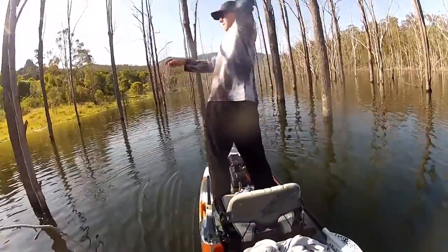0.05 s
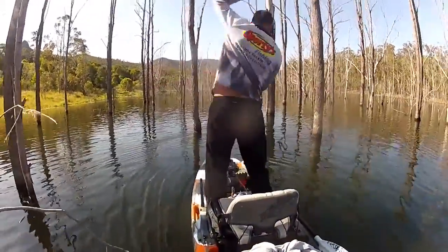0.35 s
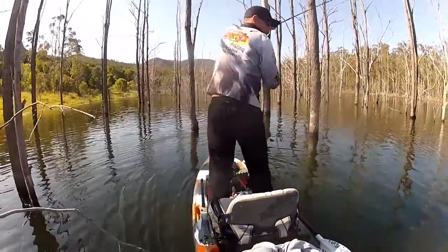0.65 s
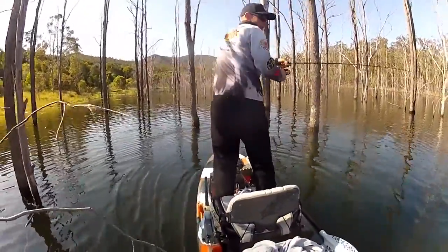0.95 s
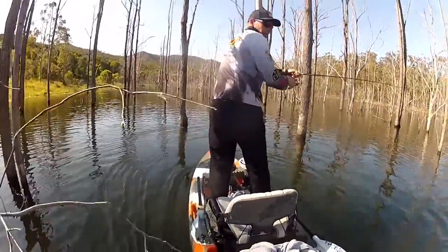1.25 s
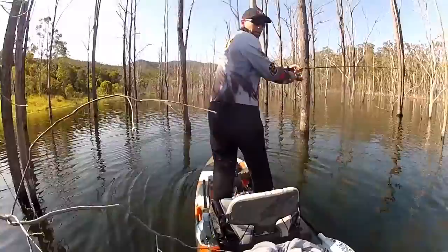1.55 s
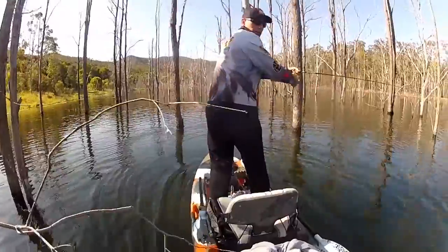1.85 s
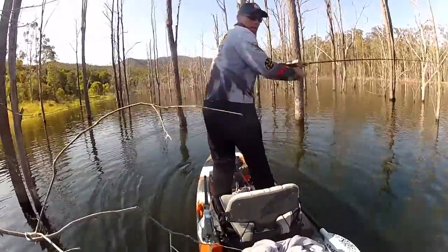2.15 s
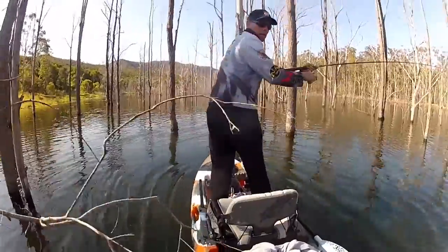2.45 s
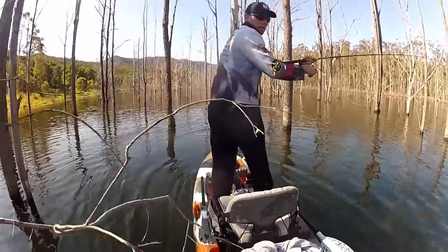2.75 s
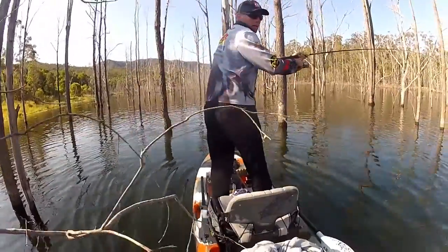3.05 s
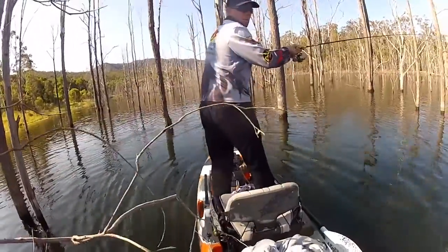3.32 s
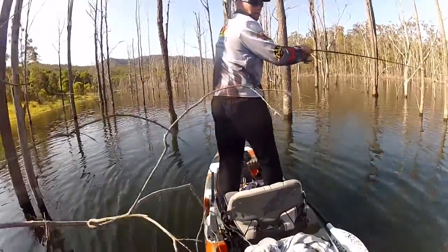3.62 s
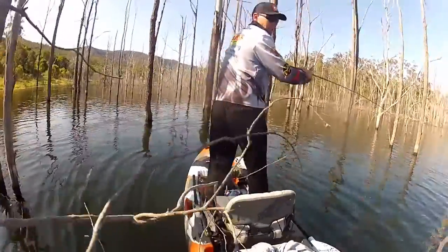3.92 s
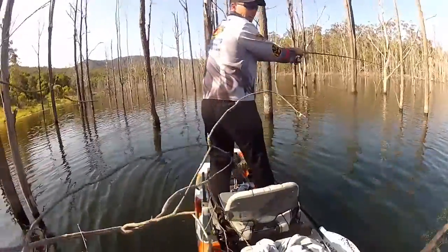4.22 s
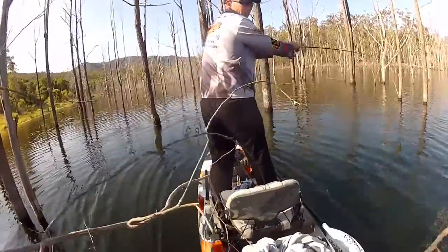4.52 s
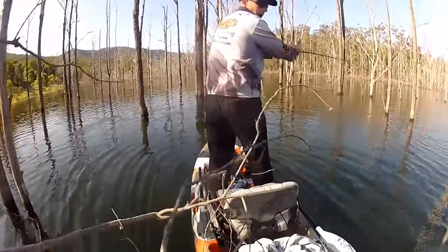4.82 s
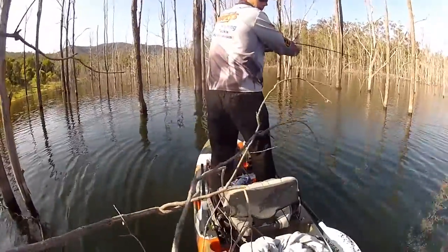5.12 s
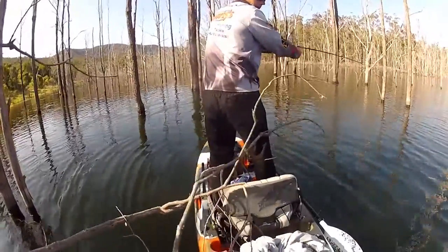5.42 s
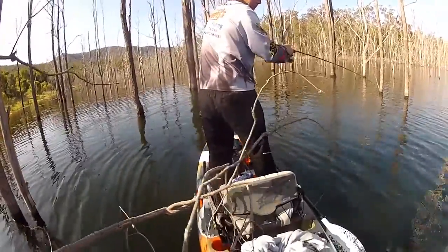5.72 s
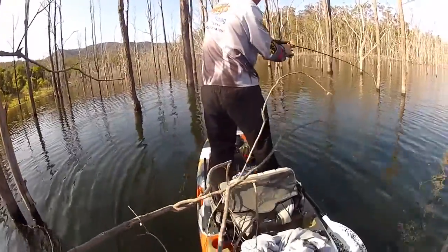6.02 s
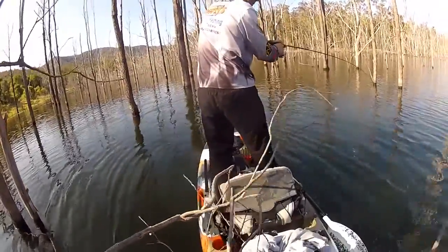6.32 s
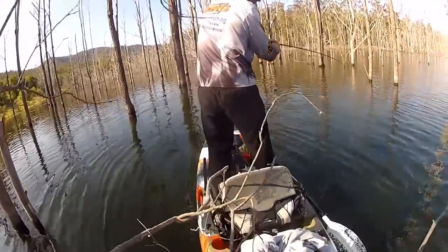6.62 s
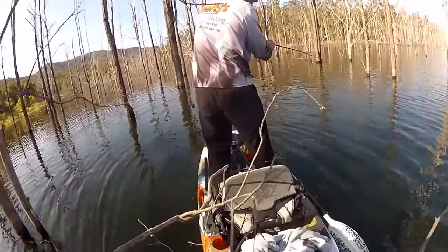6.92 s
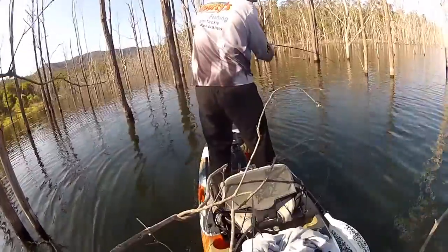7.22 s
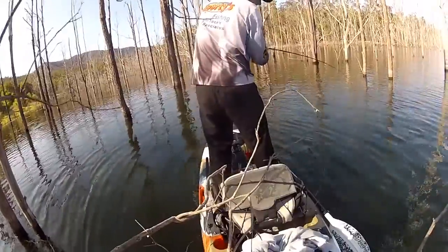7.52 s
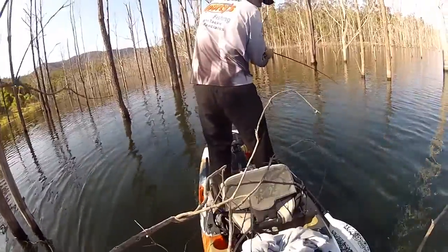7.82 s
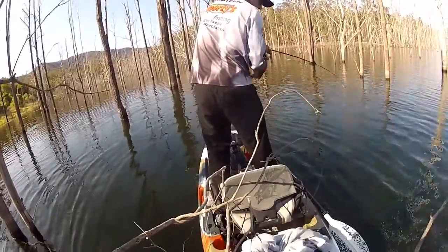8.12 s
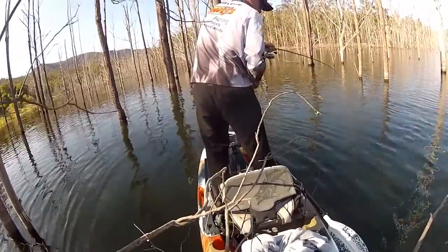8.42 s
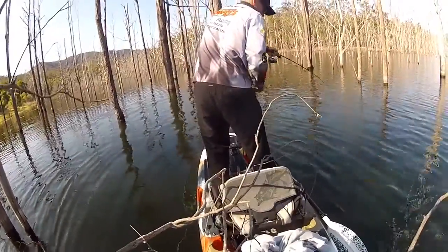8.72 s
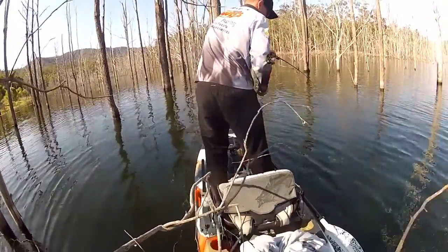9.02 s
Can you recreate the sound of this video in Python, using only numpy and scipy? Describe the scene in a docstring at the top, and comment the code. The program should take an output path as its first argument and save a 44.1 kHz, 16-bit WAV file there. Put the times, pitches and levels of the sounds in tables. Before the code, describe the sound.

Dead branches drag over a plastic kayak on a calm lake, heard very close from a microphone on the boat. Faint lapping, light twig taps and three barely audible distant bird notes come first. Then dry bark scrapes in uneven bursts, with sharp cracks, brief squeaks and hollow booms from the hull. After one more loud crunch, the contact thins to soft rubbing and scattered ticks.

```python
"""Kayak among dead branches

A plastic kayak drifts into dead branches on a calm lake, heard from a housed camera on its stern.
Dry bark drags over the boat by stick-slip friction, driving the resonances of twigs, limb and hull.
Twigs catch, spring free and knock; the hollow hull booms under the heavier strokes.
Water laps faintly, and a far bird gives three notes."""
import sys
import numpy as np
from scipy import signal
from scipy.fft import rfft, irfft, next_fast_len
from scipy.io import wavfile
from scipy.ndimage import uniform_filter1d

SR = 44100
rng = np.random.default_rng(int(sys.argv[2]) if len(sys.argv) > 2 else 0)


def to_wav(sig):
    """Store sig (one row per channel, or 1-D mono) as 16-bit WAV at the path in sys.argv[1].

    Samples outside -1..1 are clipped; the rate is SR.
    """
    pcm = np.clip(np.atleast_2d(sig), -1, 1) * 32767
    pcm = np.round(pcm).astype(np.int16)
    wavfile.write(sys.argv[1], SR, pcm.T)  # frames by channels


N = 403515
TIME = np.arange(N) / SR

# Spectrum of open water and air. Each row: frequency in Hz, relative spectral density in dB.
LAKE_SPECTRUM = [(15, -37.5), (25, -11), (101, -5), (264, -10.5), (394, -13), (709, -20), (879, -24),
                 (1280, -24.5), (1420, -28.5), (2020, -27), (2780, -31), (5420, -34.5), (6040, -37),
                 (12100, -36.5), (15000, -47)]
# A far bird's notes. Each row: centre in seconds, pitch in Hz, level in dB.
BIRD_NOTES = [(0.935, 2400, -76), (1.12, 2480, -69), (1.62, 2460, -67)]

# Modes of the hollow hull, its panels, the thick limb, the twigs, the bark's grit and cracking wood.
# Each row: frequency in Hz, bandwidth in Hz, relative gain in dB.
HULL_MODES = [(41.6, 14, -8.5), (72.4, 9.2, 0), (114, 27, 3.5), (177, 19, 1), (218, 36, 0.5),
              (277, 17, -10.5), (324, 91, -14)]
PANEL_MODES = [(450, 70, -9), (533, 44, -1), (660, 65, -3), (848, 52, 0), (955, 70, -8)]
LIMB_MODES = [(1020, 180, -2.5), (1064, 90, 5.5), (1403, 120, 6.5), (1606, 170, -4.5)]
TWIG_MODES = [(1794, 109, 3), (1865, 56, 1.5), (1959, 62, 4.5), (2290, 160, 0.5), (2560, 120, -2.5),
              (3038, 140, -7), (3426, 104, -3.5), (3712, 160, -4.5), (4390, 590, -16.5)]
GRIT_MODES = [(7330, 830, -20.5), (8520, 110, 0), (9720, 460, -5), (9770, 1120, 6), (10130, 1800, 1),
              (14200, 530, -3.5)]
CRACK_MODES = [(3450, 160, -1), (4847, 2700, -11), (6700, 2000, -10.5), (8240, 520, -2), (10010, 590, 2.5),
               (14900, 800, -2)]

# Soft pushes on the hull. Each row: centre in seconds, level in dB.
NUDGES = [(0.88, -51), (2.15, -53.5), (3.672, -31)]
# Skids that set one mode of twig or hull singing.
# Each row: centre in seconds, half-length in seconds, level in dB, frequency in Hz.
SLIDES = [(1.433, 0.0028, -39.5, 3480), (1.488, .0074, -51, 1020), (2.45, .03, -39, 300),
          (2.707, 0.0074, -31, 1850), (2.784, 0.073, -40, 985), (3.607, 0.0038, -13.5, 3285),
          (3.66, 0.022, -33, 44), (3.785, .03, -35, 488), (3.906, 0.044, -28, 526),
          (3.907, 0.025, -30.5, 866), (3.99, 0.054, -41, 70), (4.134, .06, -38, 199),
          (4.197, 0.065, -33.5, 1893), (4.558, .025, -40.5, 211), (4.612, 0.019, -27.5, 2100),
          (4.625, 0.038, -38, 1153), (4.693, 0.045, -30.5, 537), (4.73, .09, -36.5, 189),
          (4.79, 0.089, -43.5, 510), (6.271, .013, -14.5, 1865), (6.287, .025, -32.5, 205),
          (6.29, .03, -37, 70), (6.37, 0.055, -55, 660), (6.453, 0.085, -40, 114), (6.512, 0.016, -41, 850),
          (6.555, 0.0059, -36.5, 1390), (7.103, 0.031, -51, 1370), (7.48, 0.014, -57, 1447),
          (7.349, .017, -54.5, 1370), (7.711, 0.0098, -50.5, 3580), (8.819, 0.023, -43.5, 886),
          (8.863, 0.011, -42.5, 1250), (8.937, .01, -47, 1420)]
# Strokes of bark over the boat. Each row: start, hardest moment and end in seconds,
# twig drive in dB, then limb drive and hull drive in dB relative to the twigs.
STROKES = [(2.126, 2.148, 2.29, -61.5, -5, -3), (2.399, 2.445, 2.7, -33.5, 0, -7.5),
           (2.744, 2.843, 3.01, -35.5, 1.5, -10.5), (3.083, 3.242, 3.264, -39.5, 0.5, -16),
           (3.38, 3.42, 3.55, -52.5, -0.5, -14), (3.43, 3.54, 3.53, -37.5, 1, -20),
           (3.532, 3.587, 3.625, -23, -4, -14), (3.655, 3.671, 3.69, -27.5, -2.5, -2),
           (3.676, 3.754, 3.85, -34.5, -3, -0.5), (3.796, 3.904, 3.92, -31.5, 2.5, 0.5),
           (3.914, 3.948, 4.28, -44, -4, 4.5), (4.062, 4.146, 4.18, -33, -3, -9),
           (4.137, 4.19, 4.26, -33.5, -5, -8.5), (4.257, 4.295, 4.42, -39.5, -6.5, -6),
           (4.394, 4.492, 4.52, -45, -9.5, -14), (4.494, 4.61, 4.62, -34, -9, -7),
           (4.632, 4.676, 4.936, -31, -5.5, -3.5), (4.86, 4.872, 5, -41.5, -4.5, -4.5),
           (4.945, 5.055, 5.13, -49, -1, -6), (5.1, 5.184, 7.19, -56.5, 0.5, -4),
           (5.43, 5.55, 5.75, -45.5, -4, -6), (5.729, 5.748, 5.9, -37.5, -3.5, -7.5),
           (5.784, 5.903, 5.93, -37.5, -7, -14.5), (6.022, 6.077, 6.15, -54, -6, -2),
           (6.129, 6.13, 6.43, -53.5, -7.5, -4), (6.27, 6.262, 6.31, -25, -5, -4),
           (6.31, 6.332, 6.61, -36, -7, -4), (6.57, 6.59, 6.62, -57.5, -2, -4),
           (6.63, 6.66, 6.82, -50.5, -2.5, -6), (7.017, 7.119, 7.26, -53, -2.5, -11),
           (7.291, 7.32, 7.42, -54.5, -1, -10), (7.45, 7.569, 7.82, -60, 2, -8.5),
           (7.87, 7.989, 8.1, -62, -4.5, -3), (8.457, 8.66, 8.85, -61, 1.5, -9),
           (8.804, 8.91, 9.18, -47, -4.5, -9)]
# Twigs striking the boat, each level being the energy spread over 10 ms.
# Each row: start in seconds, twig, limb and panel levels in dB, decay time of the crunch in seconds.
KNOCKS = [(0.686, -60, -57, -51.5, 0.0085), (0.818, -68, -63, -57, .004),
          (0.958, -52.5, -51, -53.5, 0.0055), (1.294, -54, -61, -55.5, 0.0058),
          (1.357, -64, -70, -60, 0.0022), (1.421, -44, -53, -59, 0.0073), (1.4302, -33, -31.5, -51, 0.0025),
          (1.451, -66, -59, -53, .004), (1.6545, -45, -48.5, -55, 0.0074), (1.7, -65, -66, -69, 0.0077),
          (1.761, -61.5, -61, -69, 0.021), (2.235, -50.5, -52.5, -65, 0.0022),
          (2.264, -52.5, -57, -76, .001), (2.385, -30.5, -46, -37.5, 0.0056),
          (2.4554, -20, -20.5, -23.5, 0.002), (2.507, -32, -35, -31.5, 0.0043),
          (2.5314, -25.5, -23, -31, 0.0036), (2.565, -33.5, -57, -37, 0.0025),
          (2.691, -27.5, -39.5, -43.5, 0.014), (2.8173, -26, -18.5, -39, 0.00055),
          (3.5473, -18.5, -21.5, -35, 0.0017), (3.5902, -18, -26, -30, 0.0058),
          (3.603, -9, -19, -25, 0.0013), (3.615, -23, -34, -36, 0.0016), (3.621, -19, -25, -22.5, 0.0011),
          (3.6521, -19, -22, -35, 0.0014), (3.6552, -10.5, -14, -23.5, 0.0028),
          (3.7, -27.5, -31.5, -43.5, .002), (3.824, -24.5, -25.5, -52, 0.0047),
          (3.8922, -18, -20, -27, 0.0021), (3.917, -35, -40, -29, 0.0033), (4.07, -30, -46, -36.5, 0.0077),
          (4.081, -31.5, -31, -30, 0.0027), (4.1107, -18.5, -19.5, -24.5, 0.0024),
          (4.139, -45, -28, -26, 0.0054), (4.285, -34.5, -41, -35, 0.0029),
          (4.548, -33, -43, -39.5, 0.0023), (4.678, -26.5, -30, -25, 0.0023),
          (4.7155, -20.5, -28.5, -24.5, 0.0054), (4.9815, -35, -54, -51, 0.0032),
          (5.04, -37, -40, -55, 0.0025), (5.053, -40, -58, -54, .0015), (5.081, -44, -52, -57, 0.0068),
          (5.294, -51, -64, -66, .003), (5.139, -52, -53, -52, .004), (5.264, -45, -60, -65, 0.0057),
          (5.319, -46, -65, -72, 0.0049), (5.766, -28, -47, -45, 0.0098), (6.0176, -32, -37, -50, 0.0011),
          (6.2618, -24, -26, -30, 0.0068), (6.2715, -23, -29, -26.5, 0.0096),
          (6.2925, -28, -37, -36, 0.0026), (6.326, -30, -37, -58, 0.0037),
          (6.43, -35.5, -38.5, -52, 0.0014), (6.473, -43, -57, -63, 0.0011),
          (6.7, -43.5, -38.5, -51, 0.0044), (6.845, -40.5, -45, -50.5, 0.01),
          (6.981, -52, -55.5, -66, 0.0026), (7.323, -53, -57.5, -59.5, .003),
          (7.575, -54, -61, -59, 0.0037), (7.6178, -46, -54.5, -64, 0.0073),
          (7.701, -49.5, -62.5, -61, 0.0029), (8.808, -51.5, -55, -54, .006),
          (8.824, -51, -52, -49.5, .003), (8.8758, -38, -47, -64, 0.0036), (8.924, -41, -47, -54, 0.008)]
# Narrow bands missing from the treble, near 6 and 12 kHz. Each row: frequency in Hz, bandwidth in Hz.
TREBLE_NOTCHES = [(5840, 1400), (6314, 560), (12060, 840), (11770, 1200)]


def from_db(db):
    """Amplitude ratio of a level in decibels."""
    return 10 ** (np.asarray(db) / 20)


def unit_rms(x):
    """Normalisation to unit mean power."""
    return x / np.sqrt(np.mean(x ** 2) + 1e-20)


def drift(rate_hz):
    """Two-pole low-pass noise: a slow random wander of unit spread."""
    step, settle = 40, 2000   # samples per point; points left for the filter to settle
    pole = np.exp(-2 * np.pi * rate_hz * step / SR)
    noise = rng.standard_normal(N // step + settle + 2)
    slow = signal.lfilter([1], [1, -2 * pole, pole * pole], noise)[settle:]
    return np.interp(np.arange(N) / step, np.arange(len(slow)), unit_rms(slow))


def butterworth(x, hz, kind, order=2):
    """A filter with a maximally flat passband."""
    return signal.sosfilt(signal.butter(order, hz, kind, fs=SR, output="sos"), x)


def swell(centre_s, half_length_s):
    """A Gaussian envelope: a smooth rise and fall around one moment."""
    return np.exp(-np.minimum(2 * ((TIME - centre_s) / half_length_s) ** 2, 60))


def steady(x, span_s):
    """Division by the running rms holds the power even and keeps the faster grain."""
    return x / np.sqrt(np.abs(uniform_filter1d(x * x, int(span_s * SR))) + 1e-14)


def shaped_noise(spectrum):
    """Spectral weighting colours white noise; the result has unit power."""
    hz, db = np.transpose(spectrum)
    size = next_fast_len(N)
    bins_hz = np.maximum(np.fft.rfftfreq(size, 1 / SR), 1)
    gain = from_db(np.interp(np.log(bins_hz), np.log(hz), db))
    return unit_rms(irfft(rfft(rng.standard_normal(size)) * gain, size)[:N])


def resonate(force, modes, wander_db=0):
    """Modal superposition, neighbours in opposite sense; a travelling contact varies each one's drive."""
    out = 0
    for k, (hz, width, db) in enumerate(modes):
        radius = np.exp(-np.pi * width / SR)
        feedback = [1, -2 * radius * np.cos(2 * np.pi * hz / SR), radius ** 2]
        drive = force * from_db(wander_db * drift(2.3)) if wander_db else force
        ring = signal.lfilter([1, 0, -1], feedback, drive + 1e-18)
        out = out + (-1) ** k * (1 - radius ** 2) * from_db(db) * ring
    band_hz = [0.55 * modes[0][0], min(1.325 * modes[-1][0], SR / 2 - 1000)]
    return butterworth(out, band_hz, "band", order=3)


def slips(per_s, spread_db, clump_db, clump_hz):
    """Stick-slip friction: a Poisson train of tiny, uneven jerks whose strength comes in clumps."""
    sizes = from_db(spread_db * np.minimum(rng.exponential(1, N), 4)) * rng.choice([-1, 1], N)
    slipping = rng.random(N) < per_s / SR
    return sizes * slipping * from_db(clump_db * drift(clump_hz))


def lake():
    """Lapping is coloured noise, in phase at both ears; faint wind and wash arrive in antiphase."""
    lapping = from_db(-60.5) * shaped_noise(LAKE_SPECTRUM) * from_db(0.38 * drift(9.2))
    wind = from_db(-82.5) * unit_rms(butterworth(rng.standard_normal(N), 45, "low", order=1))
    wash = from_db(-77) * shaped_noise(LAKE_SPECTRUM)
    return lapping + (wind + wash) * [[1], [-1]]


def bird():
    """Faint notes from the shore: pure tones under Gaussian envelopes."""
    return sum(from_db(db) * swell(centre, 0.03) * np.sin(2 * np.pi * hz * TIME)
               for centre, hz, db in BIRD_NOTES)


def nudges():
    """Forced vibration: a soft push drives the hull's low modes into a dull thud."""
    push = sum(from_db(db) * swell(centre, 0.029) for centre, db in NUDGES)
    return push * steady(resonate(rng.standard_normal(N), HULL_MODES), span_s=0.04)


def slides():
    """Frictional excitation: a skidding twig feeds a run of slips into a single resonance."""
    force = slips(per_s=4900, spread_db=7.5, clump_db=-7.5, clump_hz=170)
    out = np.zeros(N)
    for centre, half_length, db, hz in SLIDES:
        near = slice(max(int((centre - 0.25) * SR), 0), int((centre + 0.25) * SR))
        singing = steady(resonate(force[near], [(hz, 8 + hz / 24, 0)]), span_s=0.037)
        out[near] += from_db(db) * swell(centre, half_length)[near] * singing
    return out


def snags(twig_gain):
    """Impulse responses: knots in the bark catch now and then, ringing the limb or a twig."""
    ticks = 0
    for modes, db in ((LIMB_MODES, -8), (TWIG_MODES, -5)):
        catches = slips(per_s=18, spread_db=2, clump_db=3, clump_hz=12)
        release = butterworth(catches, 2400, "low")   # a snag lets go gently
        ticks = ticks + from_db(db) * unit_rms(resonate(release, modes, wander_db=3))
    # under heavy pressure the bark grinds on evenly, so snags grow no further
    return np.minimum(twig_gain, from_db(-44)) * ticks


def stroke_pressure(start, hardest, end):
    """Friction sound follows the normal force: the bark grips, presses, eases and lifts off."""
    grip_db_per_s, lift_db_per_s = 1800, 400
    db = np.interp(TIME, [start, hardest, end], [-8, 0, -13.5])
    db -= grip_db_per_s * np.maximum(start - TIME, 0) + lift_db_per_s * np.maximum(TIME - end, 0)
    return from_db(np.maximum(db, -120))


def contact_gains():
    """Mechanical coupling: twigs, limb, panels and hull each follow the stroke driving them hardest."""
    resting_rub = from_db(-79) * (TIME > 3.5)   # a branch comes to lie on the boat
    gains = np.ones((4, 1)) * resting_rub + 1e-7
    for start, hardest, end, twig_db, limb_db, hull_db in STROKES:
        # the panels move with the limb and partly with the whole hull
        panel_db = limb_db - 1.5 + 0.21 * (hull_db - limb_db)
        peaks = from_db(twig_db + np.array([[0], [limb_db], [panel_db], [hull_db]]))
        gains = np.maximum(gains, peaks * stroke_pressure(start, hardest, end))
    firm_db, skip_db, skip_hz = -45.5, 2.5, 22   # below the firm level a twig skips along
    lightness = 1 / (1 + (gains[0] / from_db(firm_db)) ** 2)
    return gains * from_db(skip_db * lightness * drift(skip_hz))


def scrape(twig_gain, limb_gain, panel_gain, hull_gain):
    """Source and filter: one stream of slips shakes twigs, limb, panels and hull, and the grit hisses."""
    force = slips(per_s=6000, spread_db=3.5, clump_db=2, clump_hz=32)
    twigs = twig_gain * steady(resonate(force, TWIG_MODES, wander_db=3), span_s=0.22)
    limb = limb_gain * steady(resonate(force, LIMB_MODES, wander_db=3), span_s=0.067)
    panels = panel_gain * steady(resonate(force, PANEL_MODES, wander_db=3), span_s=0.038)
    hull = hull_gain * steady(resonate(force, HULL_MODES, wander_db=3), span_s=0.14)
    grit_gain = twig_gain * (twig_gain / limb_gain) ** 0.1   # more hiss when a stroke spares the limb
    grit = grit_gain * steady(resonate(force, GRIT_MODES), span_s=0.091)
    wood = from_db(-1) * twigs + from_db(-1.9) * limb + from_db(-8.5) * grit
    return wood + from_db(-1.5) * panels + from_db(-1) * hull


def knocks():
    """Impact and free decay: a twig taps and crunches; contact damps the wood while the hull rings on."""
    t = np.arange(SR // 9) / SR
    out = np.zeros(N + len(t))
    damping = [1, 1.92, 1]   # pressed wood has wider resonances
    pressed_twigs, pressed_limb = np.array(TWIG_MODES) * damping, np.array(LIMB_MODES) * damping
    for start_s, twig_db, limb_db, panel_db, crunch_s in KNOCKS:
        crunch = np.exp(-t / max(crunch_s, 7e-4)) + from_db(-26) * np.exp(-t / 0.008)
        force = rng.standard_normal(len(t)) * crunch
        force[0] += 2.8   # the tap
        # a gentle touch stays in contact longer and sounds rounder
        rounded = butterworth(force, min(12000 * from_db(0.47 * twig_db), 15000), "low")
        push = rounded + 14 * (t == 0)   # the heavy hull feels mostly the one push of the landing
        crack_db = 1.088 * twig_db - 5   # hard blows splinter, gentle ones only tap
        parts = ((rounded, pressed_twigs, twig_db), (rounded, pressed_limb, limb_db),
                 (push, PANEL_MODES, panel_db), (push, HULL_MODES, panel_db - 9.5),
                 (force, CRACK_MODES, crack_db))
        start = int(start_s * SR)
        for drive, modes, db in parts:
            # each landing point favours other modes
            struck = [(hz, width, mode_db + 4 * rng.standard_normal()) for hz, width, mode_db in modes]
            ring = resonate(drive, struck)
            out[start:start + len(t)] += from_db(db) * ring * np.sqrt(0.01 * SR / np.sum(ring ** 2))
    return out[:N]


def scene():
    """Structure-borne sound reaches both ears alike; delayed antiphase traces add a little width."""
    twig_gain, limb_gain, panel_gain, hull_gain = contact_gains()
    hits = knocks()
    scraping = scrape(twig_gain, limb_gain, panel_gain, hull_gain)
    contact = scraping + snags(twig_gain) + hits + slides() + nudges()
    knock_side = from_db(-22) * np.roll(butterworth(hits, 3300, "high"), SR // 900)
    boom_side = from_db(-26) * np.roll(butterworth(contact, 260, "low"), SR // 120)
    return contact + (knock_side + boom_side) * [[1], [-1]] + lake() + bird()


def record(dry):
    """Notches near 6 and 12 kHz hollow the treble, hard cracks saturate the mic, and the top is cut."""
    overload, cutoff_hz = 0.78, 14650
    for hz, width in TREBLE_NOTCHES:
        dry = signal.lfilter(*signal.iirnotch(hz, hz / width, fs=SR), dry)
    saturated = dry / (1 + (dry / overload) ** 4) ** 0.25
    return signal.sosfilt(signal.ellip(10, 0.5, 80, cutoff_hz, fs=SR, output="sos"), saturated)


dry = scene()
out = record(dry)
to_wav(out)
```